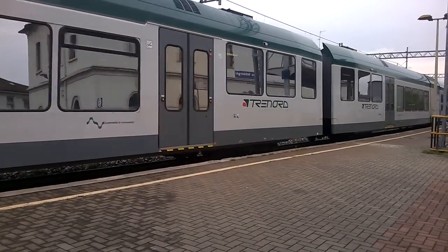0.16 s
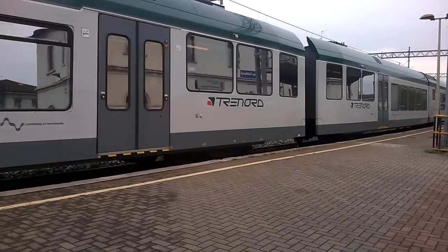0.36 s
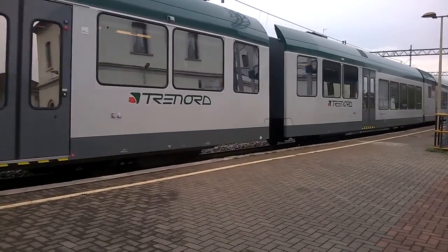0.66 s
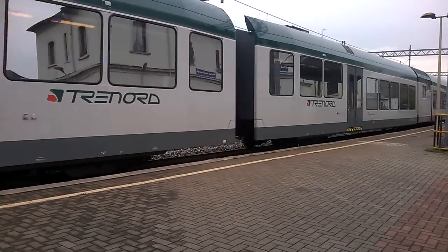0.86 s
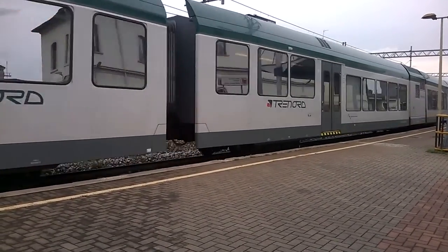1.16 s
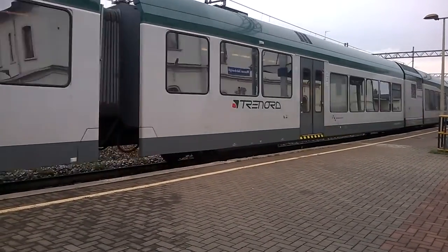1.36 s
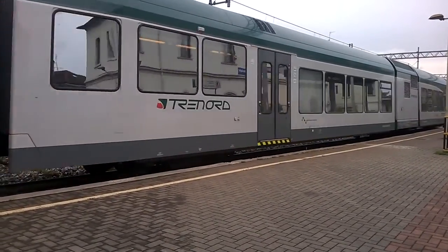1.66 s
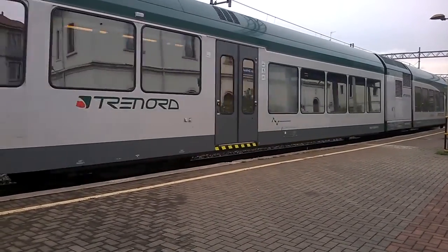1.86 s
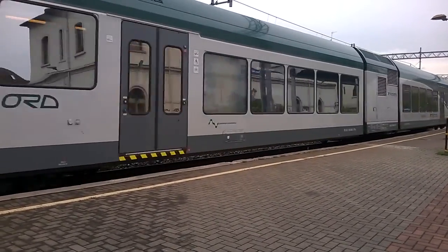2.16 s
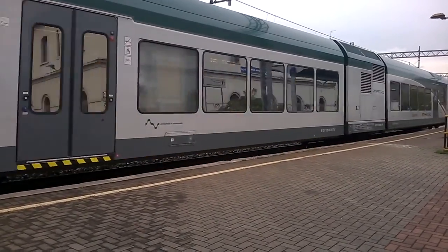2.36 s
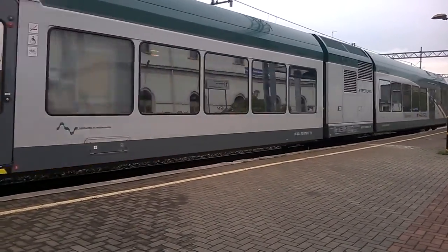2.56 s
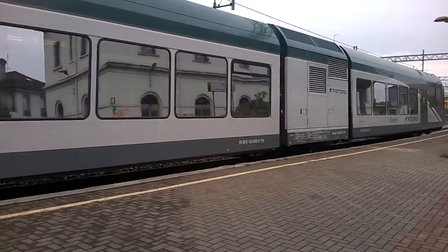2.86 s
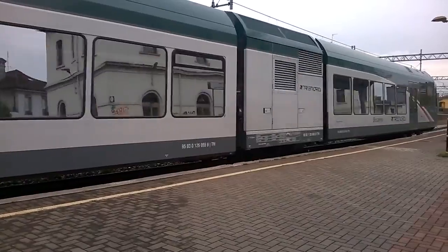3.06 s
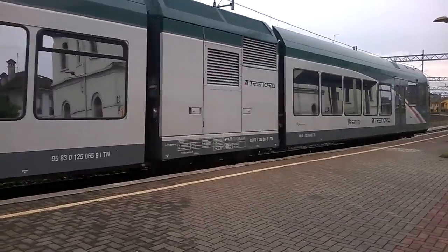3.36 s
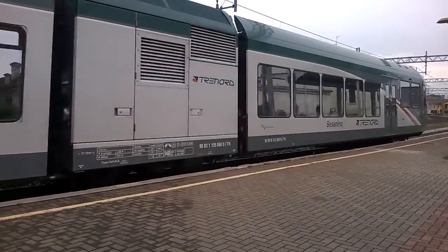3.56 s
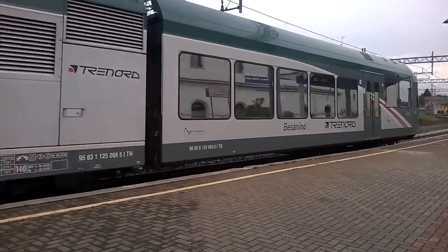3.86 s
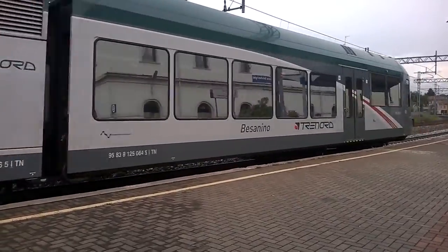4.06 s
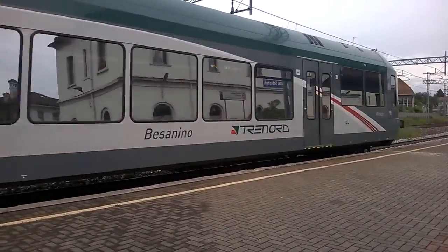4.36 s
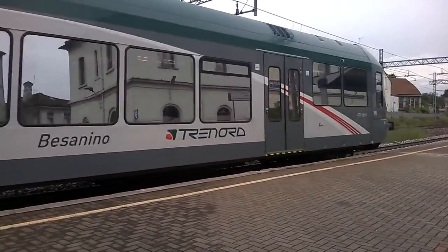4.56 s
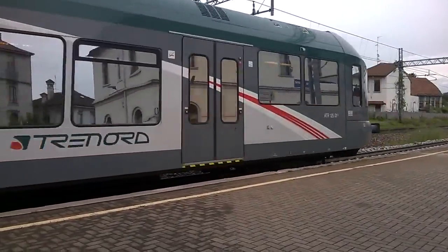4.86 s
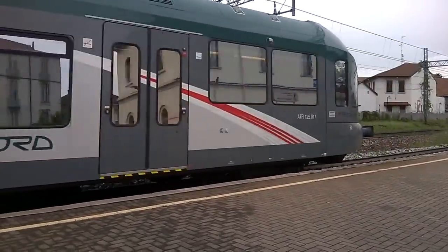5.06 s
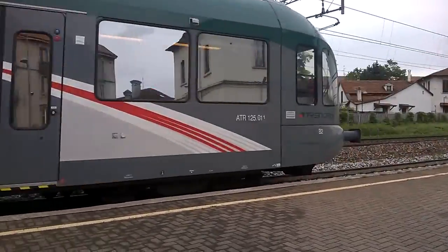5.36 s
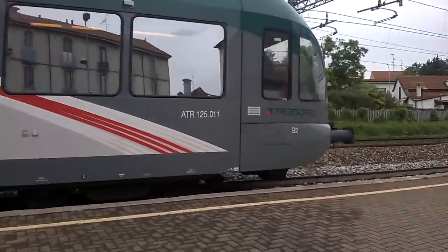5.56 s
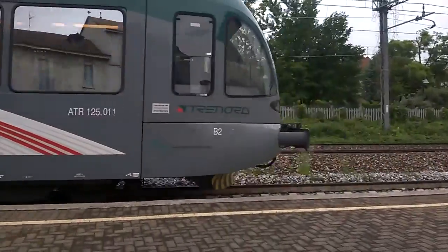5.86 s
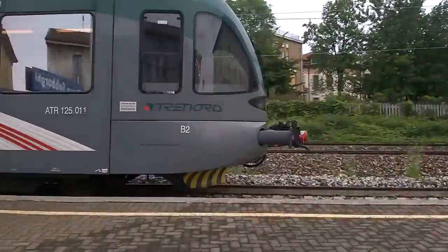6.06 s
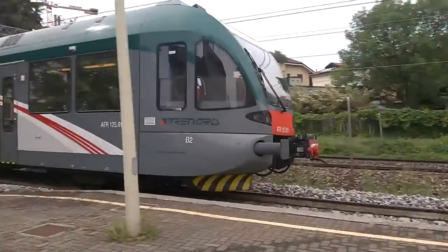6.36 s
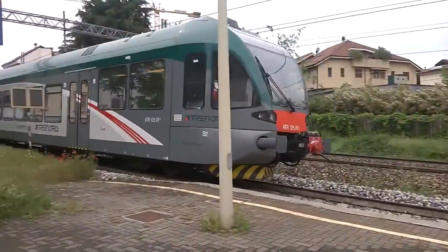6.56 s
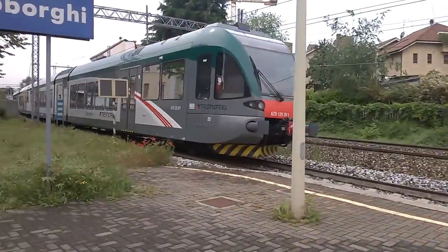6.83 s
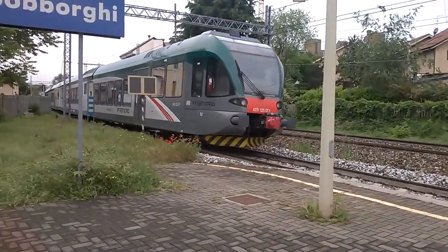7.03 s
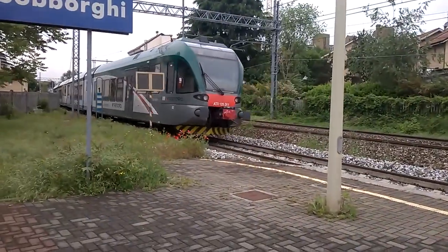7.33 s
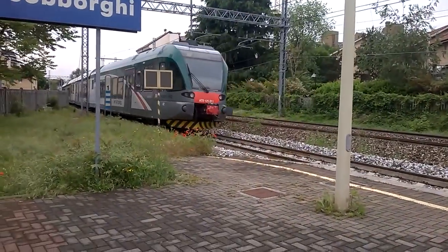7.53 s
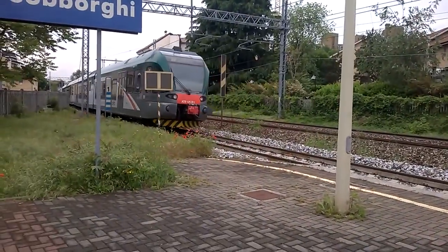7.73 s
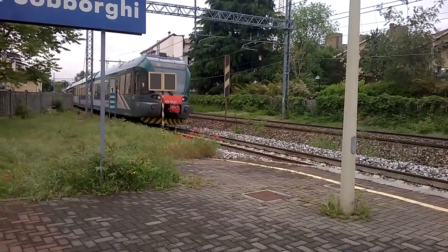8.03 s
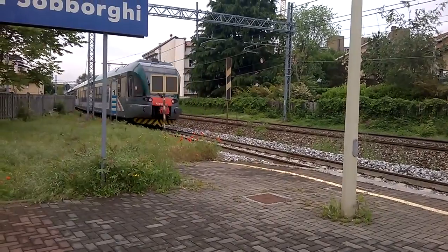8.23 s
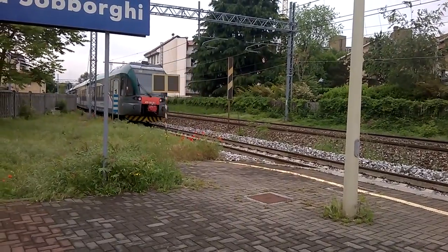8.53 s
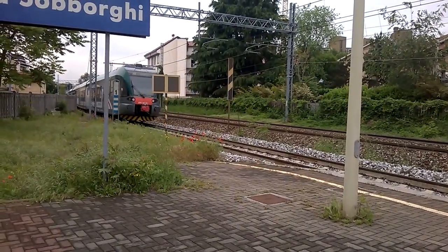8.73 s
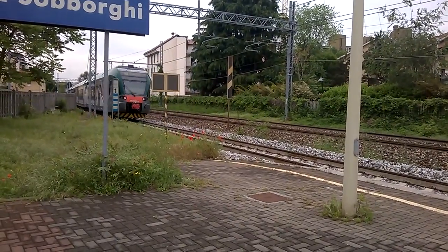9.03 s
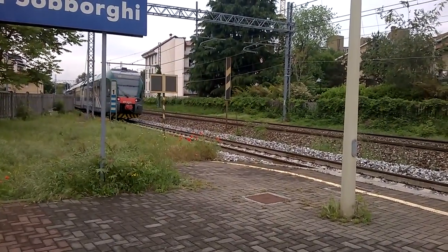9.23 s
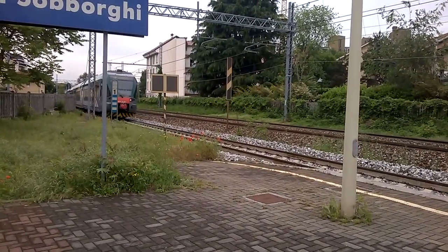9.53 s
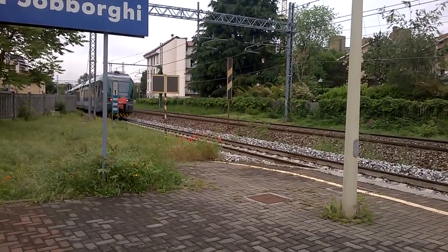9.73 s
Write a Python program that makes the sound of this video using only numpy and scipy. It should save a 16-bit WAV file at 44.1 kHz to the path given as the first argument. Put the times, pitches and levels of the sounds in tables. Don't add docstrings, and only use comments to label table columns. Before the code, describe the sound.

A diesel railcar train pulls past close by with a throbbing engine drone, whine and rumbling wheels, swells to a roar, then recedes to faint rumble.

```python
import sys
import numpy as np
from scipy import signal
from scipy.fft import rfft, irfft, next_fast_len
from scipy.io import wavfile
from scipy.ndimage import uniform_filter1d

SR = 44100
rng = np.random.default_rng(int(sys.argv[2]) if len(sys.argv) > 2 else 0)


def generate_wav(signal):
    frames = np.transpose(np.atleast_2d(signal))
    scaled = np.clip(frames, -1, 1) * 32767
    pcm = np.round(scaled).astype(np.int16)
    wavfile.write(sys.argv[1], SR, pcm)


def ratio(d):
    e = np.asarray(d, float) / 20
    return 10 ** e


N = 436149
STEP = 100


def rms_one(x):
    return x / np.sqrt(np.mean(x ** 2) + 1e-20)


def control_times():
    return np.arange(N // STEP + 2) * STEP / SR


def in_time(rows):
    s, *columns = np.transpose(rows)
    return [np.interp(control_times(), s, column) for column in columns]


def per_sample(control):
    return np.interp(np.arange(N) / STEP, np.arange(len(control)), control)


def drift(rate_hz):
    settle = 1000
    r = np.exp(-2 * np.pi * STEP * rate_hz / SR)
    noise = rng.standard_normal(N // STEP + 2 + settle)
    return rms_one(signal.lfilter([1], [1, -2 * r, r * r], noise)[settle:])


def tone(hz, rms, wander):
    phase = 2 * np.pi * np.cumsum(hz) * STEP / SR + wander
    return per_sample(np.sqrt(2) * rms) * np.sin(per_sample(phase))


def swelling(rows):
    peak_s, db, rise_s, fall_s = np.transpose(rows)[:, :, None]
    late = control_times() - peak_s
    way = np.where(late < 0, -late / rise_s, late / fall_s)
    return ratio(db) * np.cos(np.pi / 2 * np.clip(way, 0, 1))


def in_power(gains):
    return np.sqrt(np.sum(np.square(gains), axis=0))


def resonate(x, hz, width_hz):
    r = np.exp(-np.pi * width_hz / SR)
    top = np.array([1, 0, -1]) * (1 - r * r) / 2
    return signal.lfilter(top, [1, -2 * r * np.cos(2 * np.pi * hz / SR), r * r], x)


def passing_resonances(rows):
    out = np.zeros(N)
    settle = 9000
    for hz, width_hz, start, end, level_db in rows:
        at = np.arange(max(round(start * SR), 0), min(round(end * SR), N))
        noise = rng.standard_normal(2 * SR + settle)
        mode = resonate(resonate(noise, hz, width_hz), hz, width_hz)[settle:]
        swell = np.sin(np.pi * (at / SR - start) / (end - start)).clip(0) ** 0.53
        out[at] += ratio(level_db) * swell * rms_one(mode)[:len(at)]
    return out


# (time [s], distance [0 alongside to 1 far])
DISTANCE = [(0, 0), (5.5, 0.14), (6.5, 0.24), (7.5, 0.68), (9.89, 1)]
# (frequency [Hz], level [dB])
FAR_COLOUR = [(30, 3.5), (90, -1.5), (200, 0.5), (600, -5), (1100, -1), (1800, 6), (2800, -2.5), (4000, 0),
              (5000, -2), (8000, -3.5), (11000, -12.5)]


def rush(colour, level_db, patchy_db, count=3):
    size = next_fast_len(N, True)
    log_hz = np.log(np.arange(size // 2 + 1) * SR / size + 1e-3)
    points, far = np.array(colour), np.array(FAR_COLOUR)
    colour_db = np.interp(log_hz, np.log(points[:, 0]), points[:, 1], left=-120, right=-120)
    noise = rfft(rng.standard_normal(size)) * ratio(colour_db)

    low, high = np.log(points[1, 0]), np.log(points[-2, 0])
    place = np.clip((log_hz - low) / (high - low), 0, 1) * (count - 1)
    bands = [irfft(noise * np.clip(1 - np.abs(place - k), 0, 1), size)[:N] for k in range(count)]

    far_db = np.interp(np.linspace(low, high, count), np.log(far[:, 0]), far[:, 1])
    gains = ratio(np.outer(far_db, in_time(DISTANCE)[0]))
    gains /= np.sqrt(np.mean(np.square(bands), axis=1) @ gains ** 2)
    evened = np.sqrt(np.sum(np.var(bands, axis=1)) / np.var(np.sum(bands, axis=0)))
    out = np.zeros(N)
    for band, gain in zip(bands, gains):
        flicker_db = patchy_db * (drift(5.0) + drift(1.2))
        out += band * per_sample(evened * gain * ratio(level_db + flicker_db))
    return out


# (time [s], level [dB])
NEARNESS = [(0, 8), (.3, 6), (1.1, 1.5), (1.9, 0), (2.6, 1.5), (3.399, 4.5), (3.9, 9), (4.3, 10.5),
            (4.75, 6.5), (5.1, 4), (5.6, 2), (6.2, -1), (6.6, -3), (7.3, -7.5), (8.1, -9), (8.8, -9),
            (9.89, -14.5)]


def following(level_db, share, lag_s, far_db, bursts=()):
    near_db, = in_time(np.array(NEARNESS) + [lag_s, 0])
    steady = ratio(level_db + share * near_db + far_db * in_time(DISTANCE)[0])
    return 20 * np.log10(in_power([steady, *swelling(bursts)]) if bursts else steady)


# (time [s], firing rate [Hz], level of the crank orders [dB])
FIRING = [(0.0, 86.3, -46), (0.47, 86.26, -39), (1.18, 85.3, -41), (1.93, 92.9, -45), (2.15, 95, -44),
          (2.4, 92.5, -46), (2.6, 95, -42), (3.0, 94.6, -49), (3.88, 88, -48), (4.46, 88.0, -35.5),
          (5.15, 88.0, -37), (5.65, 88.4, -42), (6.36, 93.6, -51), (6.99, 93.8, -56), (7.85, 87.5, -58),
          (8.65, 82.8, -50), (9.2, 80.6, -51), (9.89, 78.6, -50)]
# (pitch [sixths of the firing rate], level [dB])
CRANK_ORDERS = [(3, -10.5), (4, -8.5), (5, -1.5), (7, -13), (9, -8.5)]
# (peak time [s], peak level [dB], rise [s], fall [s])
BEATS = [(.16, -21, .35, 0.22), (.48, -16, 0.16, .18), (.79, -16.5, 0.13, 0.19), (1.05, -15, 0.18, 0.17),
         (1.39, -18, .18, 0.19), (1.76, -19, 0.2, 0.17), (2.1, -26, 0.089, .13), (2.45, -29.5, 0.09, 0.17),
         (2.75, -27, 0.16, 0.13), (2.95, -23, 0.16, 0.15), (3.18, -22, .13, 0.19), (3.47, -23, 0.14, 0.21),
         (3.72, -28, .12, 0.22), (4.05, -25.5, 0.21, 0.15), (4.49, -18, .27, .3), (4.93, -20.5, .3, .18),
         (5.2, -31, 0.18, .15), (5.55, -24.5, .22, .95), (6.53, -35.5, .07, 0.066),
         (6.86, -40.5, .08, 0.16), (7.55, -43.5, .25, .14), (7.74, -43, .1, .08), (8.1, -52, .25, .25),
         (8.36, -43, .08, .14), (8.59, -39, .13, .16), (8.98, -39, .1, 0.16), (9.15, -39, .2, 0.22),
         (9.58, -39.5, 0.189, 0.21), (9.83, -39.5, .2, 0.31)]


def exhaust():
    firing_hz, orders_db = in_time(FIRING)
    peak_s, _, rise_s, fall_s = np.transpose(BEATS)
    overlap_s = (peak_s + fall_s)[:-1] - (peak_s - rise_s)[1:]
    null = overlap_s < 0.045
    side = (-1.) ** np.cumsum(np.r_[0, null])
    beats = swelling(BEATS)
    swell = uniform_filter1d(in_power(beats) * side[beats.argmax(axis=0)], size=19)
    out = tone(firing_hz, swell, 0.2 * drift(3.0))
    for order, order_db in CRANK_ORDERS:
        flutter_db = 2.0 * drift(2.7)
        out += tone(firing_hz * order / 6, ratio(orders_db + order_db + flutter_db), 1.74 * drift(1.5))
    return out


# (time [s], whine pitch [Hz])
WHINE = [(0, 311.6), (.8, 312), (1.6, 325.5), (2.1, 342), (2.35, 347.3), (3.0, 338), (4.2, 325.8),
         (4.7, 319.7), (5.5, 313), (6.0, 326.3), (6.8, 335.5), (7.5, 328), (8.2, 312), (8.7, 306.4),
         (9.89, 305.6)]
# (peak time [s], peak level [dB], rise [s], fall [s])
WHINE_SWELLS = [
    [(2.5, -44, .45, 1.5), (4.2, -44.5, .8, .6), (6.1, -48, .3, 1.7), (8.5, -56, 1.7, .35), (1, -60, 3, 6)],
    [(.8, -53, 1.5, 1.3), (2.6, -49, .5, 1.5), (4.3, -46, 1.5, 1.1), (5.3, -50, .8, .35),
     (5.85, -56, .15, .15)],
    [(4.6, -58, .6, .3), (4.0, -68, 2.5, 1.1), (0, -67, 1.1, 3)],
]


def generators():
    pitch_hz, = in_time(WHINE)
    out = np.zeros(N)
    for k, rows in enumerate(WHINE_SWELLS):
        level = in_power(swelling(rows)) * ratio(1.6 * drift(4.0))
        out += tone(pitch_hz * (k + 1), level, 0.5 * drift(4.5))
    return out


def turbo_whistle(rows):
    start, end = rows[0][0], rows[-1][0]
    heard, = in_time([(start - .1, 0), (start + .05, 1), (end - .15, 1), (end, 0)])
    pitch_hz, level_db = in_time(rows)
    return tone(pitch_hz, heard * ratio(level_db + 1.5 + 2.2 * drift(12)), 2.2 * drift(30))


# (time [s], pitch [Hz], level [dB])
TURBO_FRONT = [(0, 8700, -71), (.5, 9120, -73), (1.05, 9500, -70), (1.5, 9910, -68), (1.75, 9950, -73.5),
               (2.0, 9940, -70), (2.3, 9890, -64.5), (2.6, 9550, -74)]


def front_turbo():
    return turbo_whistle(TURBO_FRONT)


# (frequency [Hz], level [dB per Hz])
RUMBLE = [(18, -27.5), (28, -4), (45, -7), (70, -0.5), (110, 1), (150, 0.5), (200, 2.5), (250, -5),
          (275, -25)]
# (peak time [s], rumble level [dB], rise [s], fall [s])
BOGIES = [(1.08, -36, .05, .4), (2.09, -36, .07, .15), (2.42, -35.5, .1, .12), (3.55, -36, 0.95, 0.098),
          (3.77, -34, .08, 0.074), (3.95, -36, 0.047, .14), (4.2, -33.5, 0.052, 0.64),
          (5.33, -38.5, 0.28, 0.063)]


def track_rumble():
    level_db = following(level_db=-36.5, share=0.3053, lag_s=-0.67, far_db=-8, bursts=BOGIES)
    return rush(RUMBLE, level_db, patchy_db=0.64)


# (frequency [Hz], level [dB per Hz])
ROLL = [(350, -28), (600, -3), (655, -2), (724, -3), (894, -5.5), (958, -6.5), (1050, -9), (1320, -8.5),
        (1500, -12.5), (1950, -31), (3300, -120)]


def rolling_wheels():
    return rush(ROLL, following(level_db=-49.5, share=1.04, lag_s=0.18, far_db=2), patchy_db=0.98)


# (frequency [Hz], level [dB per Hz])
ROAR = [(150, -41.5), (250, 2.5), (333, -1), (414, -4), (491, -4), (550, -10.5), (600, -12), (780, -36.5),
        (1320, -120)]
# (peak time [s], level [dB], rise [s], fall [s])
ROAR_SURGES = [(2.88, -36, .15, 0.074), (3.11, -41, 0.066, 0.047), (3.45, -39, 0.13, .2), (3.98, -37, 0.14, .1),
               (4.65, -36, 0.15, .25), (5.72, -40, 0.15, 0.046), (6.42, -43, .07, 0.026)]


def exhaust_roar():
    level_db = following(level_db=-40.5, share=0.6544, lag_s=-0.07, far_db=-9, bursts=ROAR_SURGES)
    return rush(ROAR, level_db, patchy_db=0.2)


# (frequency [Hz], level [dB per Hz])
FAN = [(880, -34), (1500, -0.5), (2230, 0), (2680, -4.5), (3990, -4), (5000, -12.5), (6500, -36.5),
       (11000, -120)]


def cooling_fans():
    level_db = following(level_db=-50, share=1.0366, lag_s=0.0641, far_db=.5)
    return rush(FAN, level_db, patchy_db=1.03, count=5)


# (frequency [Hz], level [dB per Hz])
HISS = [(4300, -29), (5000, 1.5), (5500, -0.5), (6100, -3.5), (6650, 1), (7400, 4.5), (9100, 3),
        (10100, -1.5), (11000, -6), (12300, -8.5), (13500, -28)]
# (peak time [s], level [dB], rise [s], fall [s])
HISS_SWELLS = [
    (1.2, -58, 0.72, 0.46),
    (4.0, -53.5, 0.96, 0.52),
    (4.75, -51.5, 0.69, .25),
    (6.7, -66, 1.6, 2.02),
]


def air_hiss():
    level_db = following(level_db=-58.5, share=0.96, lag_s=0.15, far_db=-15, bursts=HISS_SWELLS)
    return rush(HISS, level_db, patchy_db=0.88, count=4)


# (pitch [Hz], width [Hz], start time [s], end time [s], level [dB])
BROAD_RESONANCES = [(2160, 450, -0.5, 0.66, -49), (3950, 300, -.4, 1.9, -58), (1328, 139, 2.9, 4.7, -51.5),
                    (2250, 486, 3.5, 5.2, -46.5), (1650, 534, 7, 7.56, -60), (332, 80, 3.75, 4.55, -34.5),
                    (396, 150, -0.5, 0.37, -42), (4450, 1300, 4.5, 4.9, -49)]


def broad_resonances():
    return passing_resonances(BROAD_RESONANCES)


# (pitch [Hz], width [Hz], start time [s], end time [s], level [dB])
SINGING = [(2815, 28, 1.35, 1.55, -54), (2830, 53, 1.85, 2.4, -61.5), (2820, 33, 2.3, 2.6, -59),
           (2797, 30, 5.42, 5.7, -57), (2820, 54, 5.7, 6.25, -57), (4200, 90, 5.4, 7, -68),
           (3540, 60, 4.7, 6.6, -65), (486, 14, 0.62, 1.8, -50), (485.7, 11, 6.6, 7.7, -59),
           (962, 22, 3.514, 5.0, -49), (881, 22, 8.8, 10.4, -66.5), (153, 7.7, 3.54, 4.33, -45),
           (150, 5.8, 0.49, 1.4, -44), (205.4, 33, 1.9, 3.2, -43.5)]


def singing_rails():
    return passing_resonances(SINGING)


# (time [s], peak level [dB], pitch [Hz])
KNOCKS = [
    (2.347, -27, 270),
    (6.288, -26.5, 342),
    (7.925, -44.5, 251),
    (8.294, -40, 259),
]


def joint_knocks():
    t, out = np.arange(round(.06 * SR)) / SR, np.zeros(N)
    for s, peak_db, hz in KNOCKS:
        at = round(s * SR)
        ring = np.sin(2 * np.pi * hz * t) + 0.66 * np.sin(2 * np.pi * 1.62 * hz * t)
        out[at:at + len(t)] += ratio(peak_db - 4.0 - 60 * t / 0.065) * ring
    return out


# (time [s], pitch [Hz], level [dB])
TURBO_REAR = [(2.5, 10350, -73), (2.75, 10170, -59.5), (3.1, 9900, -64), (3.5, 9760, -67),
              (4.15, 9760, -63), (4.7, 9790, -55.5), (5.1, 9830, -71), (5.7, 9950, -72.5), (6.6, 9920, -89)]


def rear_turbo():
    return turbo_whistle(TURBO_REAR)


def scene():
    engines = exhaust() + generators() + front_turbo() + rear_turbo()
    track = track_rumble() + rolling_wheels() + singing_rails() + joint_knocks()
    modules = exhaust_roar() + cooling_fans() + air_hiss() + broad_resonances()
    return (engines + track + modules)[None, :]


TREBLE_EDGES = [4651, 5168, 5685, 6288, 6891, 7580, 8269, 8958, 9647, 10336, 11025, 11714, 12403]


def drop_faint_treble(x):
    margin_db, chance_db = 47.0, 1.82
    floor_db, rise_db, ease_db = -88.0, 25, 16
    quiet_db, spare_hz, kept = -41, 10336, .6
    pivot_hz = TREBLE_EDGES[8]
    hz, _, frames = signal.stft(x, SR, "cosine", nperseg=2048, noverlap=1024)
    power = np.abs(frames) ** 2
    whole_db = 10 * np.log10(uniform_filter1d(power.sum(axis=0), size=5))
    luck_db = chance_db * rng.standard_normal((len(TREBLE_EDGES), power.shape[1]))
    shared_db = luck_db[-1]
    quiet = whole_db < quiet_db
    spare = quiet & (rng.random(power.shape[1]) < kept)
    for k, (low, high) in enumerate(zip(TREBLE_EDGES, TREBLE_EDGES[1:])):
        band = (hz >= low) & (hz < high)
        band_db = 10 * np.log10(power[band].sum(axis=0) + 1e-20)
        tilt_db = rise_db * max(low / pivot_hz - 1, 0) - ease_db * max(1 - low / pivot_hz, 0)
        hearing_db = floor_db + tilt_db + 1.3 * uniform_filter1d(shared_db, size=3)
        masked = ~quiet & (band_db < whole_db - margin_db + luck_db[k] + shared_db)
        unheard = (band_db < hearing_db) & ~(spare & (low == spare_hz))
        frames[band] *= ~(masked | unheard)
    return signal.istft(frames, SR, "cosine", nperseg=2048, noverlap=1024)[1][:N]


def roll_off(x):
    return signal.sosfilt(signal.butter(12, 12300, fs=SR, output="sos"), x)


def record(dry):
    hiss_colour = [(4500, -30), (5000, 1.5), (9500, -3), (10400, -1.5), (11000, 1.5), (11200, -31)]
    own_hiss = rush(hiss_colour, level_db=-83, patchy_db=1.1)
    mix = drop_faint_treble(dry[0] + own_hiss)[None, :]
    return roll_off(mix)


dry = scene()
out = record(dry)
generate_wav(out)
```